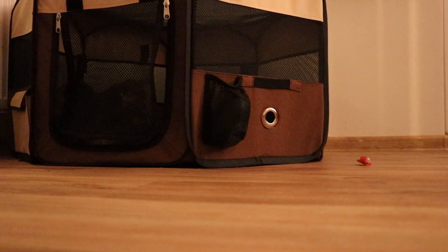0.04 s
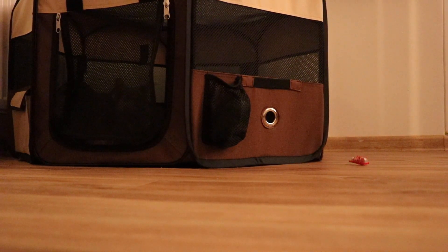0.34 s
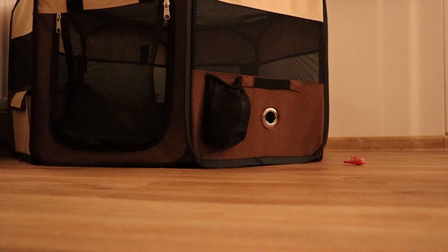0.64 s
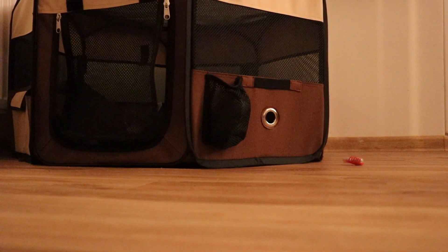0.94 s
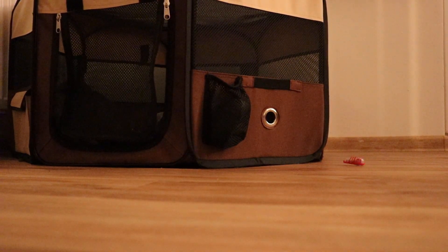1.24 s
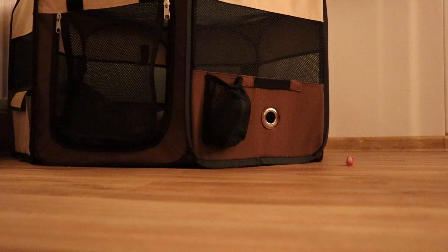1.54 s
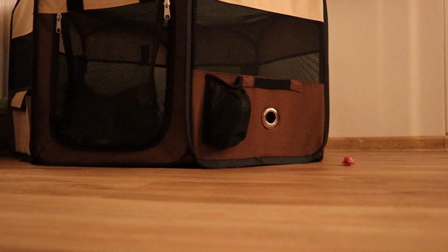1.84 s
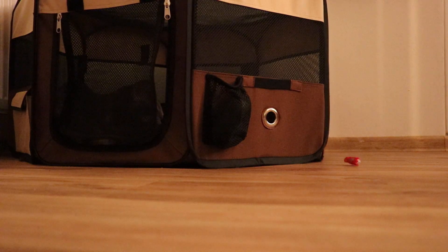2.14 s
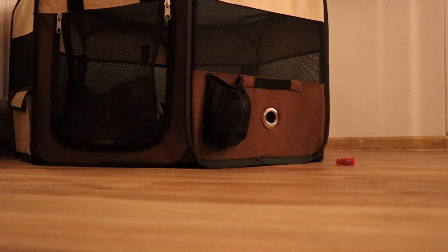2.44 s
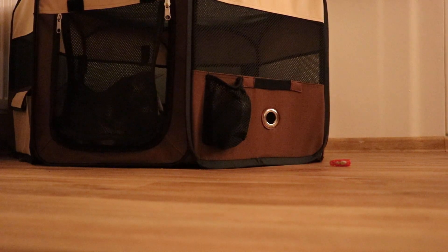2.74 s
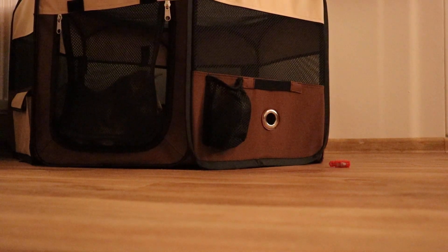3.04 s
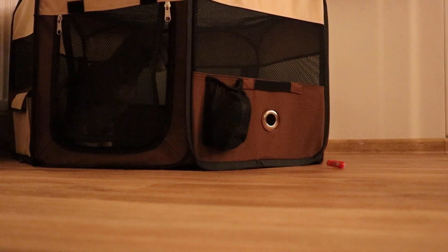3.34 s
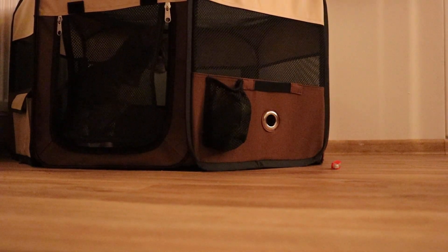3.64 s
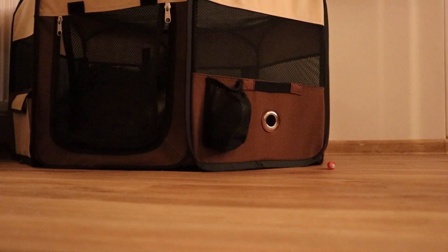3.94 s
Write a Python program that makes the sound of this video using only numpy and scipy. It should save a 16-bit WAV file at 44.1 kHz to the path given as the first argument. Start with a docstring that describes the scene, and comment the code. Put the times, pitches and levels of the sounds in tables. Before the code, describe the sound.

A small motorized toy knocks and chatters on a wooden floor with a thin whirr.

```python
"""Short, dull knocks and a light chatter: a small battery toy hops about on a wooden floor a few metres away.
Its motor shakes it, so it keeps landing on the boards, and now and then its plastic shell ticks.
The motor itself makes a thin whirr. Near walls and a small room echo the knocks,
and the room hums quietly underneath."""
import sys
import numpy as np
from scipy import signal
from scipy.fft import rfft, irfft, next_fast_len
from scipy.io import wavfile
from scipy.ndimage import map_coordinates

SR = 44100
rng = np.random.default_rng(int(sys.argv[2]) if len(sys.argv) > 2 else 0)


def wrap_up_sound(samples):
    """Save the sound to the file named by the first command line argument, as 16-bit audio."""
    columns = np.atleast_2d(samples).T
    # keep every value between -1 and 1, then stretch to whole-number steps
    tamed = np.clip(columns, -1, 1)
    steps = np.round(tamed * 32767).astype(np.int16)
    wavfile.write(sys.argv[1], SR, steps)


N = 176400  # 4 seconds

KNOCK_DB, GRAZE_DB, GRAZE_S = 20, -16.5, 0.00247
PITCH_PER_HARDNESS = .006  # a harder landing is a shorter contact, so it sounds higher
PITCH_SCATTER = 0.034  # each spot on the boards sounds a little higher or lower
# Each landing (harder is brighter): start_s, relative_level_db, hardness_db_per_octave
LANDINGS = [(0.0111, -26, 3), (0.0522, -25.5, -1), (0.0706, -21, -1.5), (0.124, -19.5, 1.5),
            (0.1351, -18.5, 3.5), (0.1755, -18.5, 3.5), (0.1987, -21, 1), (0.221, -23.5, 1.5),
            (0.238, -28.5, 0), (0.2585, -29.5, 0.5), (0.274, -31.5, -0.5), (0.2889, -24.5, 1.5),
            (0.306, -27, -1), (0.3182, -25.5, 1.5), (0.3346, -24.5, 2.5), (0.3466, -30.5, 0),
            (0.3587, -27.5, 2), (0.437, -27.5, 1), (0.4552, -29, 3.5), (0.4691, -25.5, -1),
            (0.5162, -22.5, 3), (0.5527, -18, 2), (0.6029, -21.5, 6.5), (0.6207, -25.5, 2.5),
            (0.64, -24.5, 0), (0.6704, -28.0, 0.5), (0.7089, -23.5, 1), (0.7584, -27, -1),
            (0.782, -26.5, 2.5), (0.828, -20, 4), (0.8597, -25.5, -2), (0.8745, -27, -1.5),
            (0.9283, -26, -2), (0.9579, -28, -4), (1.0327, -24, -1.5), (1.0878, -23, 1.5),
            (1.1094, -24, -3.5), (1.1387, -27.5, 4.5), (1.1916, -27.5, -6.5), (1.2365, -19.5, 3.5),
            (1.2914, -26, 0.5), (1.3075, -26.5, 0.5), (1.353, -24, 2), (1.3778, -24.5, -4.5),
            (1.401, -24, 5), (1.4184, -28, 1.5), (1.4434, -20.5, 2), (1.4815, -20, 3.5), (1.5433, -24.5, 1),
            (1.596, -25.5, -5), (1.6035, -28, 0), (1.6646, -18, 5.0), (1.7263, -27.5, -2.5),
            (1.7535, -23, 1.5), (1.7822, -24.5, -5), (1.8165, -24, 4.5), (1.8284, -30.5, -7),
            (1.8431, -26, 0.5), (1.8643, -25.5, 0.5), (1.9142, -26, 1), (1.9507, -22.5, -2),
            (2.0165, -19, 5), (2.0334, -24, -5), (2.0902, -17, 4), (2.1135, -20, -3), (2.207, -21, 1),
            (2.2883, -31, -9), (2.3184, -24.5, -2), (2.3612, -27, -4), (2.4142, -21, 1), (2.4751, -24, -2),
            (2.4825, -20, 6), (2.5354, -22, -3), (2.5833, -28, -1.5), (2.6102, -28.5, -8),
            (2.6566, -21.5, 1.5), (2.7187, -30.5, -3), (2.734, -28.5, 2.5), (2.7465, -23.5, -2.5),
            (2.786, -23.5, 1.5), (2.8425, -25.5, -2.5), (2.878, -25.5, -4.5), (2.9228, -25, -1),
            (2.9583, -24.0, 2), (3.0109, -21.5, 0.5), (3.0704, -24.5, -4), (3.076, -17, 12.5),
            (3.1633, -21, 3), (3.2193, -29, -4.5), (3.2652, -24.5, -1.5), (3.3427, -29.5, -6),
            (3.394, -26.5, -1), (3.401, -29.0, -6.5), (3.46, -21.5, -0.5), (3.5047, -24, -1.5),
            (3.5517, -25, -3), (3.5567, -20, 1), (3.6679, -30.5, -6.5), (3.7265, -22, -2.5),
            (3.7901, -23.5, -2.5), (3.8599, -22.5, -1.5), (3.9166, -19.5, 2), (3.9905, -24.5, -3.5)]
def knocks():
    """The toy lands: one end grazes the floor just before the other hits it."""
    out = np.zeros(N)
    for start_s, level_db, hardness in LANDINGS:
        pitch_ratio = np.exp(PITCH_PER_HARDNESS * hardness + PITCH_SCATTER * rng.standard_normal())
        lead_s = GRAZE_S * rng.uniform(0.477, 1.507)
        knock = amp(level_db + KNOCK_DB) * board_knock(hardness, pitch_ratio)
        add(out, start_s - BEND_LAG_S / 2, knock)
        add(out, start_s - lead_s, amp(GRAZE_DB) * knock)
    return out


BEND_LAG_S = .0006  # how late the part near 1000 Hz arrives
RESONANCE_HZ, RESONANCE_WIDTH_HZ = 1330, 380  # the boards hold this band back, so a knock swells twice
# The tone of a struck board: pitch_hz, level_db
BOARD_TONE = [(50, -46), (120, -32.5), (250, -23.5), (430, -7.5), (600, -11), (900, 3), (1130, -5),
              (1400, -6), (1950, -7.5), (2450, -18), (2900, -27.5), (3700, -26), (7000, -36), (15000, -58)]
def board_knock(hardness, pitch_ratio, size=2048):
    """One blow bends the boards. The bend travels as a wave whose high notes arrive first."""
    hz = np.fft.rfftfreq(size, 1 / SR)
    brightness_db = hardness * np.log2(np.clip(hz, 600, 2400) / 1000)
    log_gain = np.log(amp(look_up(BOARD_TONE, hz / pitch_ratio) + brightness_db))
    # pack this tone into a pulse with a sudden start
    cepstrum = irfft(log_gain)[:size // 2]
    cepstrum[1:] *= 2
    bend_phase = 4 * np.pi * BEND_LAG_S * np.sqrt(hz * 1000)
    held_phase = 2 * np.arctan2(hz * RESONANCE_WIDTH_HZ, (pitch_ratio * RESONANCE_HZ) ** 2 - hz ** 2)
    pulse = irfft(np.exp(rfft(cepstrum, size) - 1j * (bend_phase + held_phase)))[:size // 2]
    return pulse / np.linalg.norm(pulse)


TAP_DB, TAP_SPREAD_DB, SCUFF_DB = -7.5, 4.5, -22
def chatter(turns, level_db):
    """The toy taps the boards lightly about once a motor turn and scuffs along."""
    tap_at = np.flatnonzero(np.diff(np.floor(turns)) > 0)
    strength, lateness = rng.standard_normal((len(tap_at), 2)).T
    tap_at = np.clip(tap_at + lateness * 0.0012 * SR, 0, N - 1).astype(int)
    taps = unit(np.bincount(tap_at, amp(TAP_SPREAD_DB * np.minimum(strength, 1.6)), N))
    force = amp(TAP_DB) * taps + amp(SCUFF_DB) * rng.standard_normal(N)
    return signal.fftconvolve(force * amp(level_db), board_knock(hardness=-3.0, pitch_ratio=1.157))[:N]


TICK_FADE_S, TICK_RISE_S, TICK_WIDTH_OCTAVES = .007, .0004, 0.32
TICK_DB, TICK_ROOM_DB = 18.5, -6.5
# Each click of the shell: start_s, relative_level_db, pitch_hz
SHELL_TICKS = [(0.0714, -24.5, 6560), (0.1357, -27, 6140), (0.4726, -31.5, 6300), (0.5533, -23, 5300),
               (0.9296, -25, 6340), (1.034, -23.5, 4940), (1.0893, -31.5, 6300), (1.192, -32, 5700),
               (1.4817, -31.5, 6640), (1.5968, -28.5, 6100), (1.9519, -24, 5850), (2.034, -27, 4960),
               (2.1142, -30.5, 5460), (2.417, -27.5, 4220), (2.4826, -31, 4740), (2.6568, -28, 4350),
               (3.012, -32.5, 4190), (3.0767, -24, 2500), (3.0768, -30.5, 5830), (3.9141, -28.5, 4670)]
def shell_ticks(size=1024):
    """The hard shell touches down with a very short, bright click, and the room answers."""
    out = np.zeros((2, N))
    t, hz = np.arange(size) / SR, np.fft.rfftfreq(size, 1 / SR) + 1
    envelope = amp(-60 * t / TICK_FADE_S) * (1 - np.exp(-t / TICK_RISE_S))
    for start_s, level_db, pitch_hz in SHELL_TICKS:
        peak = np.exp(-.5 * (np.log2(hz / pitch_hz) / TICK_WIDTH_OCTAVES) ** 2)
        treble = amp(-12) * (hz > pitch_hz) * pitch_hz / hz
        click = irfft(rfft(rng.standard_normal((2, size))) * (peak + treble)) * envelope
        click /= np.linalg.norm(click, axis=1, keepdims=True)
        add(out, start_s - TICK_RISE_S, amp(level_db + TICK_DB) * click)
    return out + amp(TICK_ROOM_DB) * room_echo(out, side_db=-4.5, spots=3)


WHIRR_DB, TONE_SHIFT_DB, RASP_DEPTH = -0.5, 1.8, 0.2
# The tone of the whirr on the left and on the right: pitch_hz, level_db
LEFT_TONE = [(1000, -10.5), (2800, -12), (4000, -4), (4900, 2), (6200, -4), (7800, -9), (9600, -6),
             (11500, -29), (12800, -5), (15000, -37)]
RIGHT_TONE = [(1000, -12.5), (2800, -9.5), (4100, -8.5), (4700, -2.5), (6400, 0.5), (7600, -1),
              (9200, -6.5), (11000, -5), (15000, -12)]
def motor_whirr(turns, level_db):
    """The motor rasps twice a turn; its tone shifts a little as the toy swings round."""
    rasp = (1 + RASP_DEPTH * np.cos(4 * np.pi * turns)) * amp(2.25 * wobble(300))
    mid, side = rng.standard_normal((2, N)) * rasp * amp([[0], [-5]])
    spectra = signal.stft(np.array([mid + side, mid - side]), nperseg=512)[2]
    # smooth louder and softer patches across pitch and time
    blur = np.outer(signal.windows.hann(12), signal.windows.hann(70))
    patches = unit(signal.fftconvolve(rng.standard_normal(spectra.shape[1:]), blur, "same"))
    whirr = signal.istft(spectra * amp(TONE_SHIFT_DB * patches), nperseg=512)[1][:, :N]
    whirr = filtered(whirr, lambda hz: amp([look_up(LEFT_TONE, hz), look_up(RIGHT_TONE, hz)]))
    return unit(whirr) * amp(level_db + WHIRR_DB)


HISS_WIDTH_HZ = 340
# How the hiss drifts: time_s, main_pitch_hz, relative_level_db
HISS_DRIFT = [(0, 7700, -8), (0.951, 8350, -4), (1.269, 8140, -6), (1.85, 8410, -6), (2.4, 8430, -11.5),
              (3.899, 8200, -11.5)]
# Its narrow bands: ratio_to_main_pitch, relative_level_db
HISS_BANDS = [(.73, -2), (1, 1.5), (1.45, -9.5)]
def motor_hiss(level_db):
    """Thin bands of hiss in the whirr drift together as the toy turns, louder on the right."""
    pitch_hz, drift_db = over_time(HISS_DRIFT)
    phase = 2 * np.pi * np.cumsum(pitch_hz * (1 + .018 * wobble(8.8))) / SR
    out = np.zeros((2, N))
    for ratio, band_db in HISS_BANDS:
        white = rng.standard_normal((2, 2, N))
        low = unit(filtered(white, lambda hz: np.exp(-.5 * (hz / HISS_WIDTH_HZ) ** 2)))
        band = low[0] * np.cos(ratio * phase) + low[1] * np.sin(ratio * phase)  # moved up to its pitch
        out += amp(band_db + 2 * wobble(10)) * band
    return out * amp(level_db + drift_db) * amp([[-11], [0]])


RING_DB, RING_FADE_S, ROOM_DB = -57, .3, -3.5
# Notes that ring on in the floor and room: pitch_hz, relative_level_db
RINGING_NOTES = [(153, 16.5), (440, 1), (491, 2.5), (586, -1), (749, 1.5), (806, 0), (992, -1), (1068, -1),
                 (1152, -18), (1227, 3), (1445, 3.5), (1547, 5)]
# Bounces off near walls: delay_s, gain
WALL_BOUNCES = [(.0049, .14), (.0088, -.14), (.00964, -.22), (.01159, -.46), (.01204, .12), (.01331, -.17),
                (.0165, .15), (.02703, .15)]
# The tone of the echoes: pitch_hz, level_db
ECHO_TONE = [(150, 4.5), (450, -2.5), (700, -0.5), (880, -8), (1110, 6), (1600, -0.5), (2500, -1.5),
             (4000, 0.5), (10000, -28)]
def floor_and_room(boards):
    """The boards are heard directly, then as a ringing in floor and room, and as echoes."""
    t = np.arange(SR // 2) / SR
    ring, walls = np.zeros((2, 2, len(t)))
    for pitch_hz, level_db in RINGING_NOTES:
        phase = 0.2 * rng.standard_normal((2, 1))
        ring += amp(level_db + RING_DB - 60 * t / RING_FADE_S) * np.cos(2 * np.pi * pitch_hz * t + phase)
    for delay_s, gain in WALL_BOUNCES:
        skew_s = rng.normal(0, .00007)  # one side hears the bounce first
        add(walls[0], delay_s + skew_s, np.array([gain]))
        add(walls[1], delay_s - skew_s, np.array([gain]))
    echoes = through(boards, walls) + amp(ROOM_DB) * room_echo(boards, side_db=-2.0, spots=8)
    echoes = filtered(echoes, lambda hz: amp(look_up(ECHO_TONE, hz)))
    return (boards + through(boards, ring) + echoes) * amp([[.3], [-.3]])


def room_echo(sound, side_db, spots):
    """The echo changes as the toy moves about: each spot's tail blends into the next."""
    place = np.linspace(0, spots - 1, N)
    shares = [np.sqrt(np.clip(1 - abs(place - spot), 0, 1)) for spot in range(spots)]
    return sum(through(sound * share, echo_tail(side_db)) for share in shares)


# How long the room's echo takes to fall by 60 dB: pitch_hz, fade_s
ROOM_FADE = [(150, 1), (1000, 0.5), (3000, 0.31), (12000, 0.22)]
def echo_tail(side_db):
    """Many bounces blur into fading noise. side_db sets its width; the bass stays near the middle."""
    hz, t, spectra = signal.stft(rng.standard_normal((2, SR // 2)), SR, nperseg=256)
    spectra[1] *= amp(side_db) * np.minimum(hz / 1100, 1)[:, None]
    envelope = amp(-60 * t / look_up(ROOM_FADE, hz)[:, None]) * (1 - np.exp(-t / 0.00077))
    mid, side = signal.istft(spectra * envelope, SR, nperseg=256)[1]
    tail = np.array([mid + side, mid - side])
    return tail / np.linalg.norm(tail[0])


HUM_DB, HUM_SIDE_DB = -59, -4
# The tone of the quiet room: pitch_hz, level_db
HUM_TONE = [(20, -19), (35, -38), (85, 5), (110, -2.5), (155, 5), (200, 2), (400, 0), (1500, -42),
            (8000, -25)]
def room_hum():
    """A low, steady noise fills the room."""
    white = rng.standard_normal((2, N))
    mid, side = filtered(white, lambda hz: amp(look_up(HUM_TONE, hz)))
    return amp(HUM_DB) * (unit(mid) + amp(HUM_SIDE_DB) * unit(side) * np.array([[1], [-1]]))


def amp(db):
    """Turn decibels into a gain."""
    return 10 ** (np.asarray(db) / 20)


def unit(x):
    """Scale to an average strength (rms) of 1."""
    return x / np.sqrt(np.mean(x ** 2) + 1e-20)


def look_up(table, hz):
    """Read between a table's rows on a musical pitch scale."""
    pitches_hz, values = np.transpose(table)
    return np.interp(np.log(hz + 1), np.log(pitches_hz + 1), values)


def over_time(table):
    """Join timed rows into one curve for each value column."""
    time_s, *columns = np.transpose(table)
    return [np.interp(np.arange(N) / SR, time_s, column) for column in columns]


def wobble(rate_hz):
    """A smooth curve through rate_hz random points a second."""
    return map_coordinates(rng.standard_normal(int(N * rate_hz / SR) + 4), [np.arange(N) * rate_hz / SR])


def filtered(sound, response):
    """Multiply each frequency by response(hz)."""
    size = next_fast_len(N + SR // 2)
    return irfft(rfft(sound, size) * response(np.fft.rfftfreq(size, 1 / SR)), size)[..., :N]


def through(sound, echoes):
    """Give a sound a left and right pattern of echoes."""
    return signal.oaconvolve(np.atleast_2d(sound), echoes, axes=1)[:, :N]


def add(out, start_s, sound):
    """Mix a sound in at a given time."""
    first = max(0, round(start_s * SR))
    part = out[..., first:first + sound.shape[-1]]
    part += sound[..., :part.shape[-1]]


MOTOR_HZ, MOTOR_WANDER, LEFT_LAG_S = 87.9, .05, .000042
# How lively the toy is: time_s, relative_whirr_db, relative_chatter_db
LIVELINESS = [(0, -41, -30.5), (.11, -44.5, -38), (.18, -43.5, -32), (.4, -44, -34.5), (1.0, -44.5, -33.5),
              (1.85, -43.5, -38.5), (2.3, -44, -43.5), (4, -44.5, -43.5)]
def scene():
    """The toy, a little to the right, over the low hum of the room."""
    whirr_db, chatter_db = over_time(LIVELINESS)
    turns = np.cumsum(MOTOR_HZ * (1 + MOTOR_WANDER * wobble(6))) / SR
    boards = knocks() + chatter(turns, chatter_db)
    toy = floor_and_room(boards) + shell_ticks() + motor_whirr(turns, whirr_db) + motor_hiss(whirr_db)
    # the right ear hears it first
    toy = filtered(toy, lambda hz: np.exp(1j * np.pi * hz * LEFT_LAG_S * np.array([[-1], [1]])))
    return toy + room_hum()


TOP_HZ = 16000
def record(dry):
    """Cut away the very highest treble."""
    return filtered(dry, lambda hz: hz < TOP_HZ)


dry = scene()
out = record(dry)
wrap_up_sound(out)
```